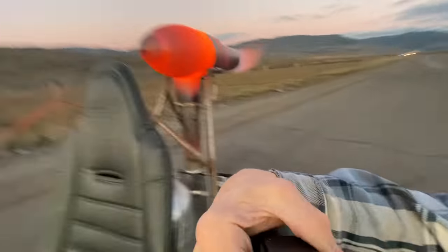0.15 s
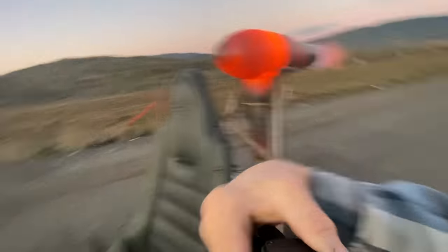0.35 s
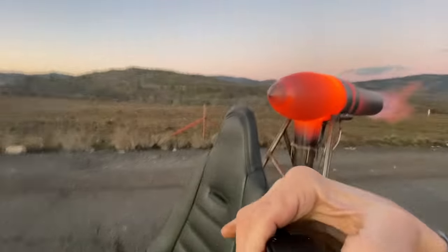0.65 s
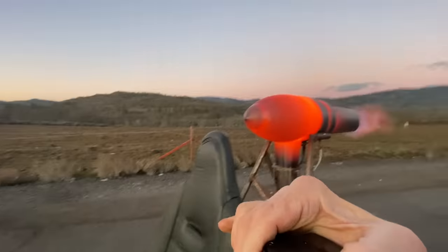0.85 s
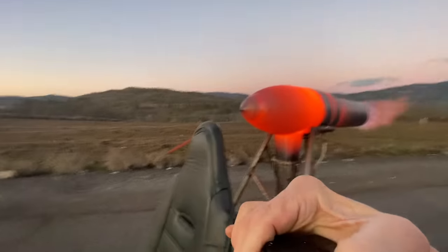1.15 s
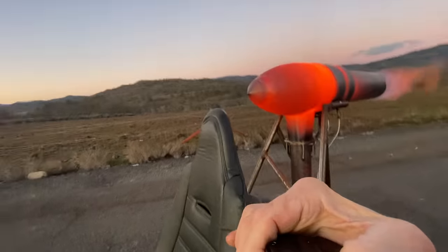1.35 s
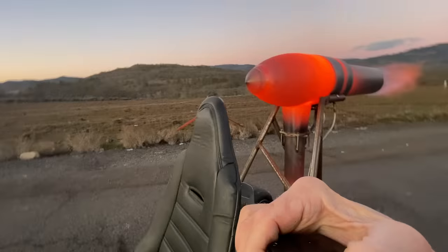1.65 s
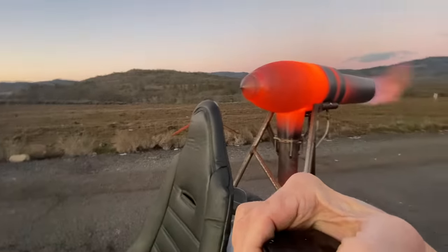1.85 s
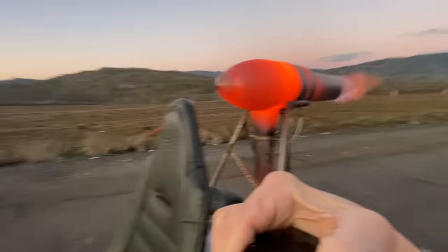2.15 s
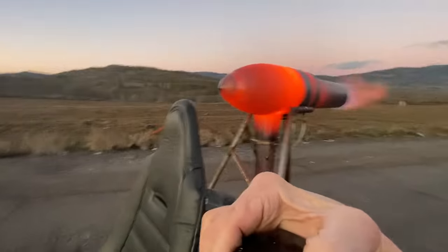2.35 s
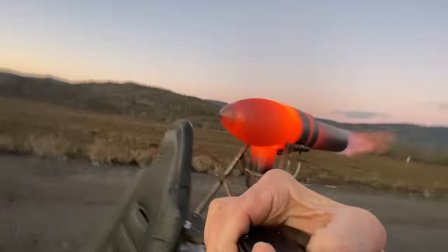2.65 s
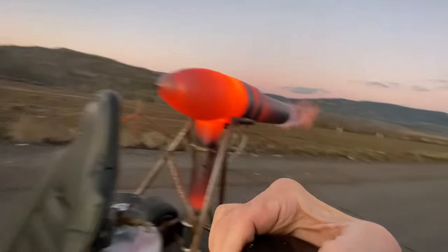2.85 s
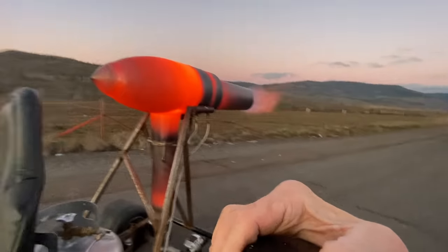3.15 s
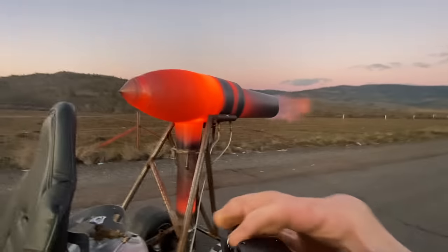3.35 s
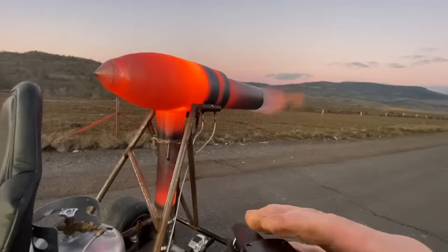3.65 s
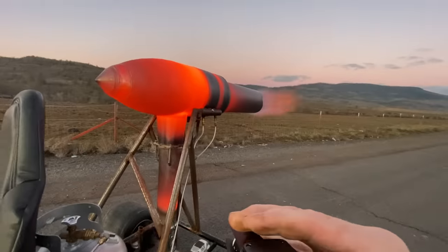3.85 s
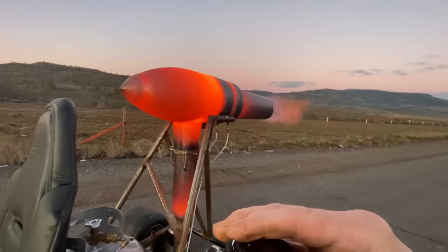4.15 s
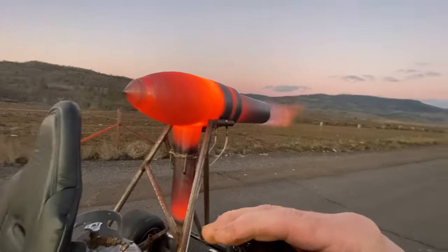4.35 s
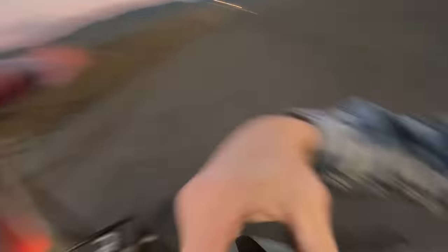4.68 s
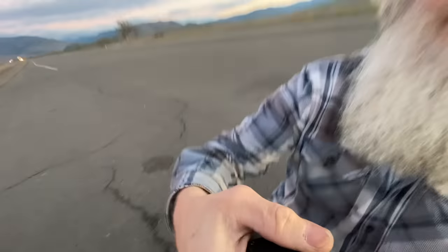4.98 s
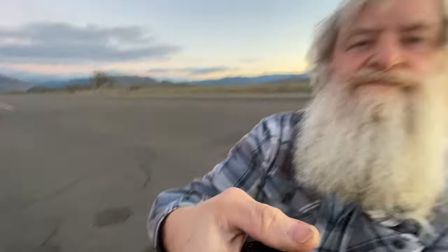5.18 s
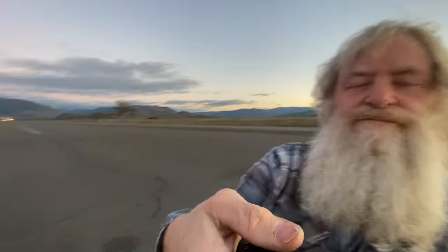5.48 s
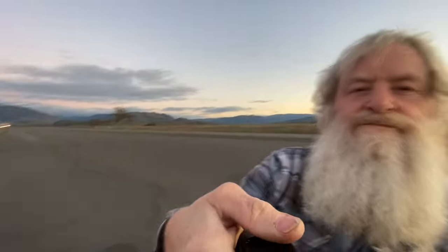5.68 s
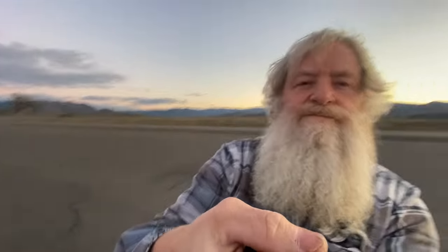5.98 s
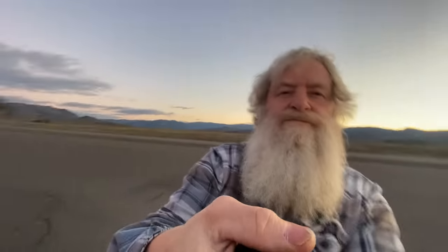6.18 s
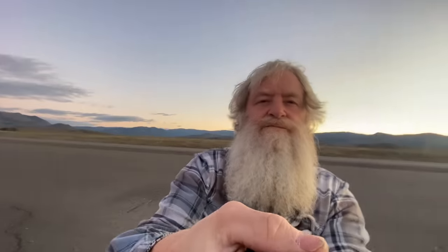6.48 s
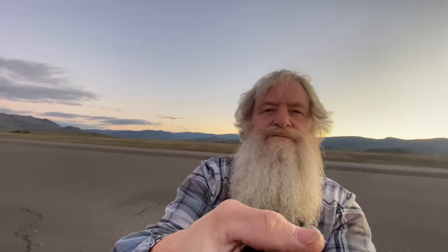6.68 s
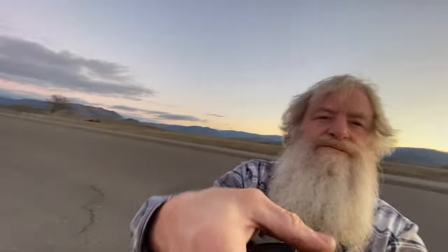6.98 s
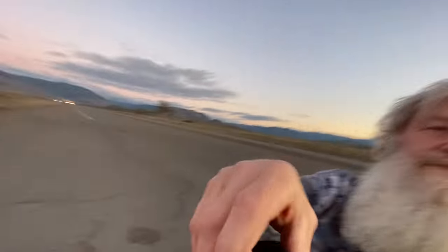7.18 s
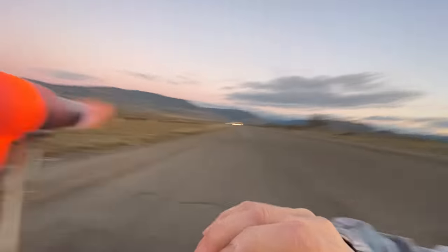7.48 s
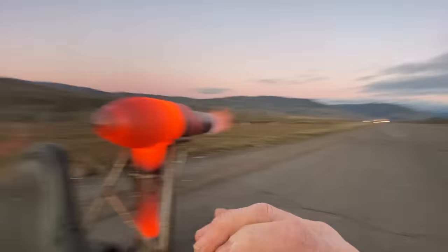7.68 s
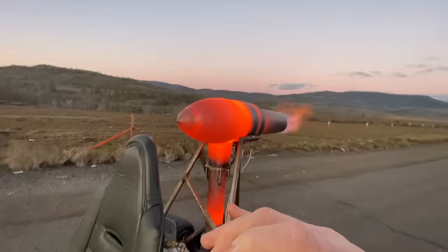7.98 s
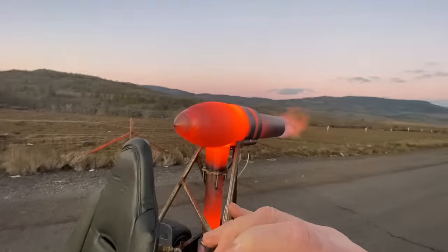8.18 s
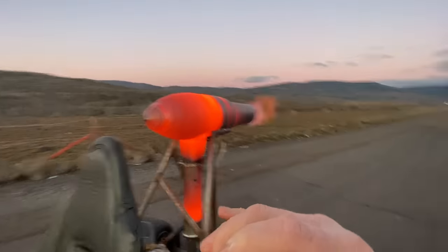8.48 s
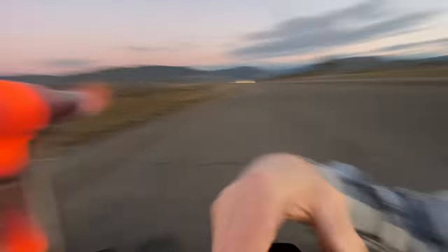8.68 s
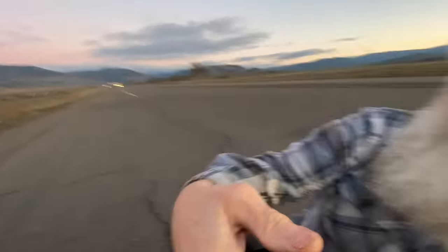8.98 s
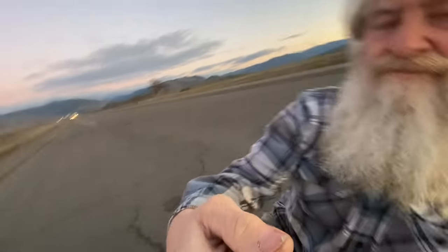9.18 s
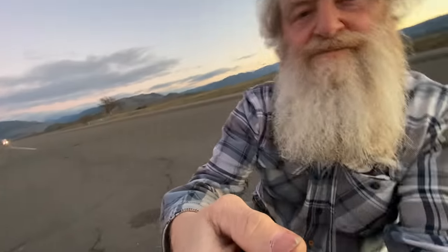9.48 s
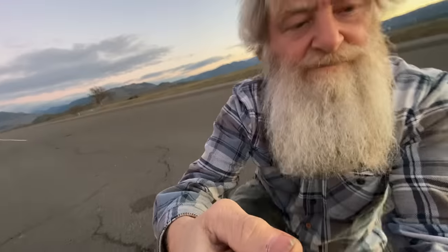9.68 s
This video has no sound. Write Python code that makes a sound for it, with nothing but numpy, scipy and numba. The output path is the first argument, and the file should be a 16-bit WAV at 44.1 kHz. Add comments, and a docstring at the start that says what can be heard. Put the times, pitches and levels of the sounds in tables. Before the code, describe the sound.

A small red-hot pulse jet runs without pause on a kart, an arm's length from a hand-held camera on an open road. Rapid chugs, about eight a second, flutter beneath a hoarse howl that whoops upward with each beat. Ribbed roar and gas hiss ride above. The sound grows fuller around two to four seconds, then turns duller as the camera faces away, shifting in stereo.

```python
"""Pulsing jet burner on a kart

A small pressure jet burns on a kart on an open road, an arm's length from a hand-held camera that turns to and fro.
The flame chugs: low pressure thumps, and noise ringing in hot pipes as a howl with short pure surges after them.
Flickering resonances of noise make a ribbed roar and the hiss of the gas jet; short echoes colour both.
Turning the camera changes which microphone port hears the engine first and loudest."""
import sys
import numpy as np
from scipy import signal
from scipy.fft import rfft, irfft, next_fast_len
from scipy.io import wavfile
from scipy.ndimage import uniform_filter1d, map_coordinates
from numba import njit

SR = 44100
rng = np.random.default_rng(int(sys.argv[2]) if len(sys.argv) > 2 else 0)


def store_pcm(level_fs):
    """Save levels as 16-bit WAV."""
    pcm = np.round(np.clip(level_fs, -1, 1) * 32767).astype(np.int16)
    wavfile.write(sys.argv[1], SR, np.atleast_2d(pcm).T)


N = 433499
T = np.arange(N) / SR  # time in seconds


def every_chug():
    """The flame keeps its beat: weak chugs share out each gap between strong ones."""
    # The strong chugs. Each row: centre in seconds, relative thump level in dB.
    strong = [(0.189, -24), (0.291, -21), (0.468, -23), (0.581, -21), (0.921, -20), (1.072, -19.5),
              (1.223, -24), (1.346, -19), (1.469, -21), (1.591, -20), (1.699, -37), (2.07, -31),
              (2.174, -35), (2.385, -18), (2.556, -18), (2.816, -31), (3.212, -18), (3.325, -23),
              (3.446, -15), (3.556, -19), (3.679, -25), (3.798, -24), (3.919, -22), (4.096, -30),
              (4.226, -34), (4.561, -30), (4.834, -27), (4.933, -26), (5.325, -42), (5.45, -30),
              (5.881, -23), (6.04, -37), (6.336, -27), (6.786, -22), (8.172, -28), (8.291, -25),
              (8.415, -28), (8.6, -30), (8.704, -22), (8.838, -34), (9.007, -27), (9.13, -26), (9.262, -35),
              (9.794, -23)]
    period_s = 0.118
    weak_db, weak_scatter_db, weak_jitter_s = -61, 4, 0.0053
    edges = [strong[0][0] - 2 * period_s, *np.transpose(strong)[0]]
    weak = []
    for a, b in zip(edges, edges[1:]):
        steps = max(round((b - a) / period_s), 1)
        weak.append(np.linspace(a, b, steps + 1)[1:-1])
    weak = np.concatenate(weak)
    chance = rng.standard_normal((len(weak), 2)).T
    times = weak + weak_jitter_s * chance[0]
    levels_db = weak_db + weak_scatter_db * chance[1]
    return sorted(list(strong) + list(zip(times, levels_db)))


def chugs():
    """Each chug sucks pressure down between two rebounds; gas flow dips just before, and the gas heats until the next."""
    thump_hz, dip_s, dip_lead_s = 98, 0.0074, 0.017
    wave, dip = np.zeros(N), np.zeros(N)
    beats = every_chug()
    for s, db in beats:
        near = slice(max(int((s - 0.1) * SR), 0), int((s + 0.1) * SR))
        since = T[near] - s
        u = np.pi * thump_hz * since
        wave[near] += undb(db + 3.0) * (2 * u ** 2 - 1) * np.exp(-u ** 2)
        dip[near] += np.exp(-((since + dip_lead_s) / dip_s) ** 2)
    # the heat starts over 26.9 ms before each chug's centre
    cycle = np.interp(T + 0.0269, np.transpose(beats)[0], np.arange(len(beats)))
    heat = uniform_filter1d((cycle % 1) ** 1.3, int(0.019 * SR))
    return wave, dip, heat


def swept_pipes(heat):
    """Pipe resonances climb in pitch as the gas heats: the whoop of the howl, a low hum and its overtone."""
    # Each row: lowest pitch in Hz, rise at full heat in Hz, width setting in Hz, relative level in dB.
    climbing = [(645, 141.5, 61, 1), (142.4, 28, 35, -11.5), (329, 39, 27.6, -24.5)]
    whoop, hum, overtone = (ring(hz + rise_hz * heat, width, db) for hz, rise_hz, width, db in climbing)
    # the hum is loud enough to steepen: squaring it gives a second harmonic that swells with it
    hum_hz = climbing[1][0] + climbing[1][1] * heat
    harmonic = unit(svf(hum ** 2, 2.16 * hum_hz, 110.0))
    return whoop, hum, overtone + undb(-23.0) * harmonic


def low_rumble(thump, hum, overtone, rumble_db, lag_ms, howl_pan):
    """Burning noise and the hum join the thumps; the lag between the two ports is stretched in the bass."""
    # Colour of the burning noise below the howl. Each row: pitch in Hz, relative level per Hz in dB.
    burning = [(30, -41), (50, -16), (100, -6), (158, -3), (180, -3.5), (205, -22.5), (260, -10)]
    # Colour of the growl around the overtone. Each row: pitch in Hz, relative level per Hz in dB.
    growl = [(190, -5), (230, 5), (280, -0.5), (340, 3), (410, -8.5), (480, 7.5), (560, -12), (700, -13)]
    bass_lag = 2.02 * lag_ms - 0.15
    low = undb(rumble_db - 8.5) * (noise(slope(burning)) + undb(12.5) * hum) + thump
    low = ports(low, bass_lag, 0.044 * howl_pan + 0.44, alike=0.99)
    upper = undb(rumble_db + 10.5) * (overtone + undb(-20.5) * noise(slope(growl)))
    return low + ports(upper, 1.5 * bass_lag, 0.16 * howl_pan, alike=0.8)


def surges():
    """The howl locks to one pitch for a moment: near-pure swells gliding up a little, and their envelope."""
    # Each row: centre in seconds, level over the howl in dB (before mixing), pitch at the centre in Hz,
    # length setting in seconds (the swell lasts about 0.84 of it).
    locked = [(0.305, 4.5, 683, 0.016), (0.721, 6, 647, 0.054), (1.101, 3, 652, 0.034),
              (1.195, -2, 638, 0.016), (1.273, 2.5, 726, 0.021), (1.388, 5, 666, 0.015),
              (1.437, -1.5, 714, 0.023), (1.492, 1.5, 665, 0.033), (1.623, 0, 733, 0.035),
              (1.699, -2.5, 640, 0.021), (1.931, 4.5, 644, 0.042), (1.988, 1, 730, 0.023),
              (2.016, 2, 710, 0.024), (2.087, 2, 696, 0.02), (2.13, 2.5, 695, 0.016),
              (2.298, -0.5, 672, 0.038), (2.417, 3.5, 628, 0.057), (2.575, 4, 640, 0.063),
              (2.825, 4, 655, 0.024), (2.878, -1, 668, 0.0094), (3.012, 3, 640, 0.035),
              (3.054, -0.5, 719, 0.025), (3.105, 5, 650, 0.011), (3.144, 5, 722, 0.022),
              (3.23, 4.5, 646, 0.019), (3.294, 0.5, 750, 0.011), (3.343, 3.5, 629, 0.044),
              (3.396, 0.5, 746, 0.01), (3.467, -3, 642, 0.032), (3.576, 4, 670, 0.011),
              (3.602, 1.5, 718, 0.022), (3.695, 3.5, 680, 0.019), (3.945, 4, 635, 0.044),
              (3.987, 5, 676, 0.018), (4.121, 6.5, 642, 0.035), (4.265, 7.5, 639, 0.055),
              (4.835, 3, 644, 0.046), (5.368, 8.5, 638, 0.044), (5.777, 5.5, 670, 0.015),
              (6.556, 3.5, 620, 0.04), (7.312, 4.5, 626, 0.058), (7.426, 5, 645, 0.034),
              (7.708, 5, 680, 0.019), (8.034, 4.5, 650, 0.043), (8.313, 3, 651, 0.049),
              (8.59, 4, 638, 0.033), (8.735, 6.5, 640, 0.021), (8.854, 4, 627, 0.045),
              (8.942, 6, 720, 0.013), (9.148, 1, 638, 0.064), (9.572, 3, 658, 0.038)]
    hush_s = 0.013  # how gradually the envelope opens ahead of a surge
    tone, swell = np.zeros(N), np.zeros(N)
    phases = rng.uniform(0, 2 * np.pi, len(locked))
    for (s, db, hz, length), phase in zip(locked, phases):
        near = slice(max(int((s - 0.15) * SR), 0), int((s + 0.13) * SR))
        since = T[near] - s
        shape = np.exp(-np.abs(since / (0.42 * length)) ** 9.0)
        # the pitch climbs 300 Hz per second
        wave = np.sin(2 * np.pi * (hz + 150 * since) * since + phase)
        tone[near] += np.sqrt(2) * undb(db) * shape * wave
        before = np.exp(-((since + 0.3 * length + hush_s / 2) / hush_s) ** 2)
        swell[near] += np.maximum(shape, before)
    return tone, np.clip(swell, 0, 1)


def pipe_howl(whoop, dip, turned_away, howl_db, howl_lag, howl_pan):
    """Flame noise rings in the hot pipes; while the howl is locked to one pitch its noisy part gives way."""
    # Steady pipe resonances. Each row: pitch in Hz, width setting in Hz, relative level in dB.
    resonances = [(645.6, 69, 1.5), (595, 270, -24), (863, 102, -14.5)]
    tone, swell = surges()
    pipe = whoop + undb(-1.5) * noise(modes(resonances, steep=1.61))
    pipe = pipe * (1 - 0.34 * swell) * undb(-2.5 * dip - 4.0)
    # the howl's low flank comes forward from behind
    pipe = pipe + ring(np.full(N, 510.), 235, -22 + 9 * turned_away)
    return ports(pipe + undb(1.5) * tone, howl_lag, howl_pan, alike=0.95) * undb(howl_db)


def ribbed_roar(lag_ms, shade_db, turned_away):
    """Bands of flickering resonances, low to high, each reaching the two ports in its own way."""
    # The bands, each a list of resonances. Each row: pitch in Hz, width setting in Hz, relative level per Hz in dB.
    bands = [
        [(1130, 420, -4.5), (1363, 200, -2)],
        [(1771, 88, -1.5), (1996, 470, -5.5)],
        [(2463, 187, -6), (2847, 85, -6.5)],
        [(3273, 334, -5)],
        [(3520, 290, -5.5)],
        [(4056, 790, -10)],
    ]
    # How each band reaches the ports. Each row: share of the engine's lag, added lag in ms,
    # share of the roar's pan, added left minus right in dB, likeness of the ports from 0 to 1 (before turning away).
    reach = [(0.97, 0.009, 1.1, 0, .97), (.92, .008, .35, -.6, .96), (0.88, 0.008, .15, -1.4, .97),
             (0.9, 0.005, .1, -3.8, .95), (.8, .005, .1, -4, .93), (.8, .03, .1, -2.5, .7)]
    # Left minus right follows the lag and levels off: centre lag in ms, span in ms, middle in dB, swing in dB.
    roar_pan = pan(lag_ms, *(.06, .2, .5, 4))
    # Nearly facing the jet, one high band reaches the right port later and louder:
    # centre lag in ms, span in ms, added lag in ms, left minus right in dB.
    centre_ms, span_ms, facing_ms, facing_db = (.07, .035, .079, -2.5)
    facing = np.exp(-((lag_ms - centre_ms) / span_ms) ** 2)
    # one entry per band; the upper bands are shaded side-on
    late_ms = [0, 0.0077 - 0.021 * turned_away, -0.07 * turned_away, 0.0021, facing_ms * facing, 0]
    shaded_db = [0, 0, 0, shade_db, shade_db + facing_db * facing, shade_db]
    # from behind, the ports hear the roar less alike
    unlike = 0.1 * turned_away ** 2
    roar = np.zeros((2, N))
    for band, (share, added_ms, swing, added_db, alike), late, shaded in zip(bands, reach, late_ms, shaded_db):
        sound = ribs(band, drift=0.012, flicker_db=2.5, sway_db=1.0)
        band_lag = share * lag_ms + added_ms + late
        roar += ports(sound, band_lag, swing * roar_pan + added_db + shaded, alike - unlike)
    return roar


def jet_hiss(lag_ms, shade_db, turned_away):
    """The gas jet hisses through flickering treble resonances; from behind, the lower hiss is shaded."""
    # Each row: pitch in Hz, width setting in Hz, relative level per Hz in dB.
    hissing = [(4365, 61, 1), (4810, 260, 1.5), (5270, 300, 0.5), (6180, 880, -0.15), (6920, 220, 2),
               (7450, 490, 1.8), (8640, 1400, -1)]
    jet = unit(ribs(hissing, drift=0.006, flicker_db=2.2, sway_db=0.3, tilt_db=2.0 * turned_away - 2.0))
    return ports(jet, 0.569 * lag_ms - 0.045, 0.88 * shade_db - 5.0, alike=0.37)


def top_hiss():
    """The finest hiss reaches the ports at a fixed lag and with opposite sign however the camera points."""
    # Each row: pitch in Hz, width setting in Hz, relative level per Hz in dB.
    finest = [(9250, 2600, -0.5), (10150, 2800, 2), (11700, 3200, 2), (14700, 8100, -1)]
    port_lag_ms = 0.227  # the right port hears it this much earlier
    top = unit(ribs(finest, drift=0.0049, flicker_db=1.3, sway_db=0.1))
    return ports(top, -port_lag_ms, 0.1, alike=0.85) * np.array([[1], [-1]])


def mirrored(gas, lag_ms):
    """Kart, hand and camera body mirror the gas noise: short echoes comb its colour, shifting as the camera turns."""
    # Each row: delay in ms, change in delay per ms of the engine's lag, right port later by ms, level in dB.
    echoes = [(0.731, 0.034, 0.018, -17), (1.5, -0.26, -0.05, -20), (2.92, 0.47, 0.057, -16)]
    out = gas.copy()
    for late_ms, turn, apart_ms, db in echoes:
        for port, side in enumerate((-0.5, 0.5)):
            delay_s = (late_ms + turn * lag_ms + side * apart_ms) / 1000
            out[port] += undb(db) * np.interp(T - delay_s, T, gas[port])
    return out * undb(-0.51)


def camera_turns():
    """Turning the camera moves the lags and levels smoothly from row to row."""
    # Each row: time in seconds, how much later the right port hears the engine in ms (scaled for each part),
    # the same for the howl in ms, howl left minus right in dB, then relative levels in dB of the rumble,
    # howl, roar, hiss and top hiss.
    turning = [(0.0, 0.31, -0.18, -6, -25, -22.5, -35, -34.5, -35),
               (.2, 0.14, -0.27, 0, -26.5, -20.5, -38, -35.5, -33.5),
               (.28, 0.034, -.25, 4, -28, -26.5, -38.5, -35, -36),
               (.5, -0.13, -0.082, -11.5, -25.5, -28, -37, -34.5, -38),
               (1.05, -0.074, -0.043, -8.5, -26.5, -23, -35, -33.5, -36),
               (1.5, -0.14, -0.049, -13.5, -25.5, -23.5, -33.5, -32.5, -35),
               (2.3, -0.022, -0.16, -6, -23.5, -19.5, -32, -30.5, -34.5),
               (2.68, 0.0067, 0.075, -4, -25, -19.5, -32, -30.5, -34),
               (2.95, 0.12, 0.12, 6, -25.5, -17, -33.5, -33.5, -31),
               (3.1, 0.21, 0.2, 8, -24, -21, -31.5, -27.5, -29.5),
               (3.38, 0.11, 0.19, 6.5, -26, -19, -33.5, -33, -31),
               (4.05, 0.14, 0.16, 7, -24, -19, -33.5, -31, -30.5),
               (4.27, 0.11, .1, 6, -29.5, -18.5, -34.5, -33, -31.5),
               (4.45, 0.11, 0.13, 4.5, -28.5, -24.5, -36.5, -34.5, -32.5),
               (4.65, 0.2, -0.052, 9.5, -32, -22.5, -35, -31, -32.5),
               (4.78, 0.3, -0.44, 14.5, -25.5, -26, -35, -31.5, -34.5),
               (5.0, 0.34, 0.19, 12, -30, -22.5, -36, -36, -36),
               (5.3, 0.43, 0.35, 7.5, -29.5, -22.5, -40.5, -37.5, -40),
               (6.05, 0.42, 0.25, 11.5, -25.5, -24, -38.5, -35, -38),
               (6.3, 0.36, 0.68, 8.5, -28.5, -18, -37.5, -34, -36.5),
               (7.0, 0.4, 0.64, 6.5, -26.5, -19, -40, -35, -39.5),
               (7.3, 0.47, 0.57, 5, -26, -18.5, -38, -35.5, -37.5),
               (7.55, 0.41, 0.12, 8, -26.5, -26.5, -38, -34, -36.5),
               (7.63, 0.28, 0.076, 11, -25.5, -24, -37, -35, -33.5),
               (7.8, 0.145, 0.15, 7, -28.5, -26.5, -36, -32.5, -34),
               (7.87, 0.056, -0.03, 2, -28.5, -25, -36.5, -35.5, -35),
               (8.57, 0.083, -0.034, 3, -28, -19.5, -35, -34, -33),
               (8.64, 0.11, 0.16, 6, -24.5, -23, -36.5, -32, -32.5),
               (8.76, 0.34, 0.31, 10, -30, -24, -35, -33.5, -34),
               (8.84, 0.4, 0.26, 9, -27.5, -25, -36.5, -34.5, -35.5),
               (9.3, 0.37, 0.26, 4.5, -25, -22.5, -38, -34.5, -35),
               (9.83, 0.39, 0.37, 4.5, -24.5, -22, -39, -37.5, -37.5)]
    s, *columns = np.transpose(turning)
    return [np.interp(T, s, column) for column in columns]


def side_shade(lag_ms):
    """Side-on, the camera body shades the treble of the right port."""
    # Centre lag in ms, span in ms, left minus right in dB (scaled for the hiss).
    centre_ms, span_ms, db = (0.135, 0.029, 5.5)
    return db * np.exp(-((lag_ms - centre_ms) / span_ms) ** 2)


def pan(lag_ms, centre_ms, span_ms, middle_db, swing_db):
    """The port that hears the engine first hears it louder, up to a limit."""
    return middle_db + swing_db * np.tanh((lag_ms - centre_ms) / span_ms)


def ports(shared, lag_ms, pan_db, alike):
    """Both ports hear one sound, the right lag_ms later; scatter off kart and hand adds an unrelated part to each."""
    alike = np.clip(alike, 0, 1)
    halves = np.array([[0.5], [-0.5]])  # left, right
    at = np.arange(N) + halves * lag_ms * SR / 1000
    both = map_coordinates(shared, at.reshape(1, -1), order=3, mode="mirror").reshape(2, N)
    # copies shifted by over 0.1 s serve as the unrelated parts
    own = np.array([np.roll(shared, SR // 9), np.roll(shared, -SR // 8)])
    return (np.sqrt(alike) * both + np.sqrt(1 - alike) * own) * undb(halves * pan_db)


def ribs(table, drift, flicker_db, sway_db, tilt_db=0):
    """Resonances that each drift in pitch, sway slowly and flicker on their own; tilt_db is per octave."""
    total = np.zeros(N)
    for hz, width, db in table:
        moving_hz = hz * (1 + drift * walk(1.49))
        # a wider rib carries more noise
        level_db = db + 10 * np.log10(width / 300) + tilt_db * np.log2(hz / 6000)
        level_db = level_db + sway_db * walk(3.39) + flicker_db * walk(35.0)
        total += ring(moving_hz, width, level_db)
    return total


def ring(hz, width, db):
    """Flame noise in one resonance with a moving centre, narrowed by two filters in a row."""
    once = svf(rng.standard_normal(N), hz, 1.0 * width)
    return undb(db) * unit(svf(once, hz, 1.46 * width))


@njit
def svf(x, hz, width):
    """State-variable band-pass with a moving centre, gain 1 there."""
    y, band, low = np.empty(len(x)), 0., 0.
    for i in range(len(x)):
        g, k = np.tan(np.pi * hz[i] / SR), width / hz[i]
        v = (band + g * (x[i] - low)) / (1 + g * (g + k))
        band, low, y[i] = 2 * v - band, low + 2 * g * v, k * v
    return y


def noise(gain):
    """White noise coloured by gain(Hz), with an rms (average strength) of 1."""
    size = next_fast_len(N)
    hz = np.arange(1, size // 2 + 2) * SR / size
    return unit(irfft(rfft(rng.standard_normal(size)) * gain(hz), size)[:N])


def slope(points):
    """Gain through (Hz, dB) points, next to nothing outside them."""
    hz, db = np.transpose(points)
    return lambda f: undb(np.interp(np.log(f), np.log(hz), db, left=-90, right=-90))


def modes(table, steep):
    """Gain of noise-driven resonances; steep darkens the valleys."""
    def gain(f):
        power = sum(undb(2 * db) / (1 + (2 * (f - hz) / width) ** 2) ** steep for hz, width, db in table)
        return np.sqrt(power)
    return gain


def walk(rate):
    """Random levels held 1 / rate seconds and smoothed twice; spread 1."""
    k = int(SR / rate)
    steps = np.repeat(rng.standard_normal(N // k + 1), k)
    return unit(uniform_filter1d(uniform_filter1d(steps, k), k)[:N])


def undb(db):
    """Decibels to a plain gain."""
    return 10 ** (np.asarray(db) / 20)


def unit(x):
    """Scale to an rms (average strength) of 1."""
    return x / np.sqrt(np.mean(x ** 2))


def scene():
    """Thumps, rumble, howl, roar and hiss share one chugging beat and one turning camera."""
    lag_ms, howl_lag, howl_pan, rumble_db, howl_db, roar_db, hiss_db, top_db = camera_turns()
    shade_db = side_shade(lag_ms)
    turned_away = np.clip(lag_ms / 0.19 - 0.9, 0, 1)
    thump, dip, heat = chugs()
    # with its back to the jet the camera shades the top of the climb
    heat = heat * (1 - 0.15 * turned_away)
    whoop, hum, overtone = swept_pipes(heat)
    rumble = low_rumble(thump, hum, overtone, rumble_db, lag_ms, howl_pan)
    howl = pipe_howl(whoop, dip, turned_away, howl_db, howl_lag, howl_pan)
    # the gas noises dip with the flow just before each chug
    gas = ribbed_roar(lag_ms, shade_db, turned_away) * undb(roar_db - 2.27 - 2.7 * dip)
    gas += jet_hiss(lag_ms, shade_db, turned_away) * undb(hiss_db - 2.2 * dip)
    gas += top_hiss() * undb(top_db - 1.6 * dip)
    return rumble + howl + mirrored(gas, lag_ms)


def record(dry):
    """Each port has its own treble colour; the camera thins the deep bass and cuts the top."""
    # Colour of the two ports. Each row: pitch in Hz, left minus right in dB.
    colour = [(20, -1.93), (2500, 0), (3800, 8), (6500, 11.5), (7500, 4.5), (8700, -0.5), (10500, -1.5),
              (12000, 0), (22050, 0)]
    bass_hz, top_hz = 50, 15750
    hz, db = np.transpose(colour)
    tilt_db = np.interp(np.arange(N // 2 + 1) * SR / N, hz, db) / 2
    dry = irfft(rfft(dry) * undb([tilt_db, -tilt_db]), N)
    dry = signal.sosfilt(signal.butter(3, bass_hz, "high", fs=SR, output="sos"), dry)
    return signal.sosfilt(signal.ellip(10, 0.2, 80, top_hz, fs=SR, output="sos"), dry)


dry = scene()
out = record(dry)
store_pcm(out)
```